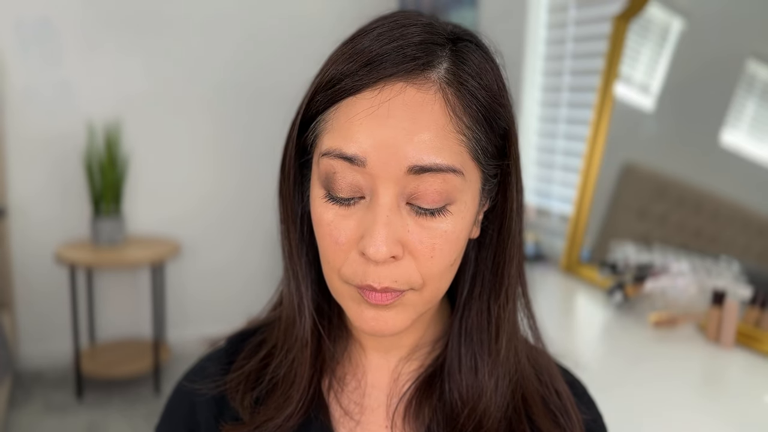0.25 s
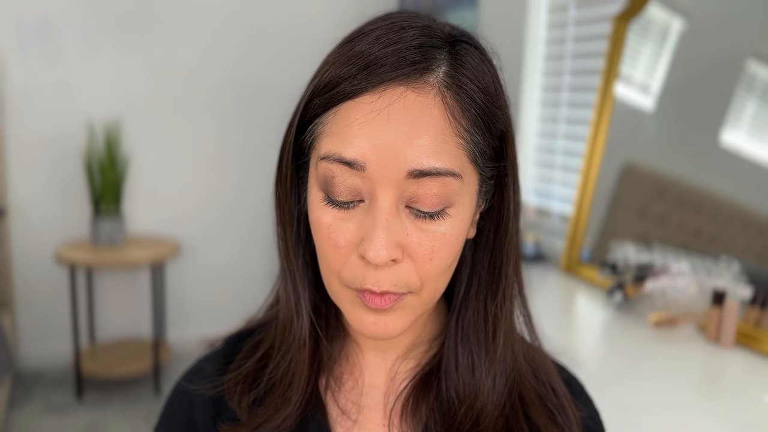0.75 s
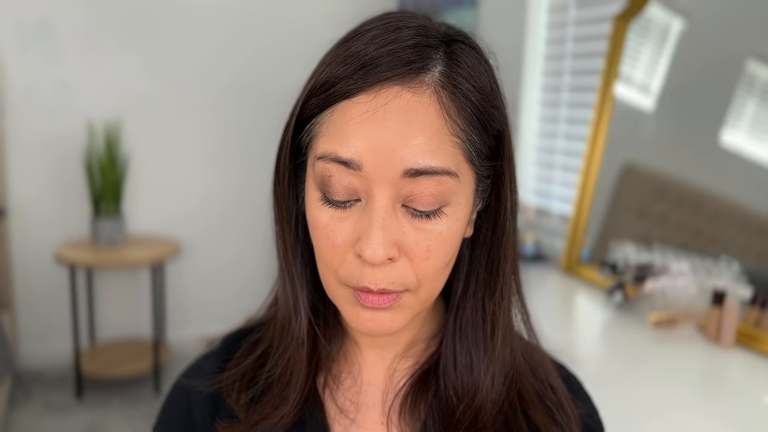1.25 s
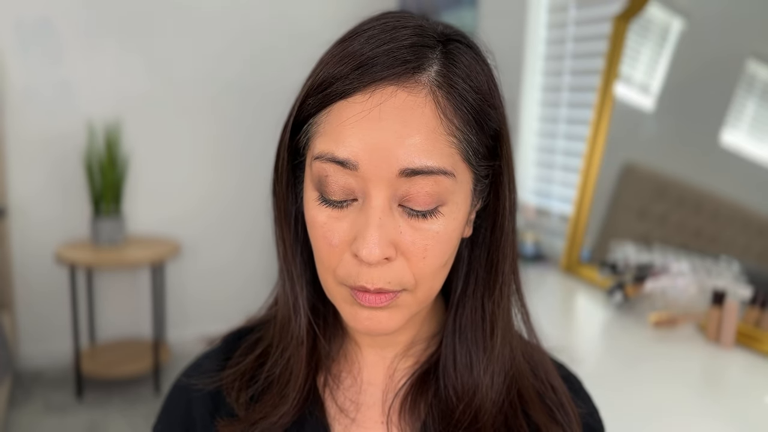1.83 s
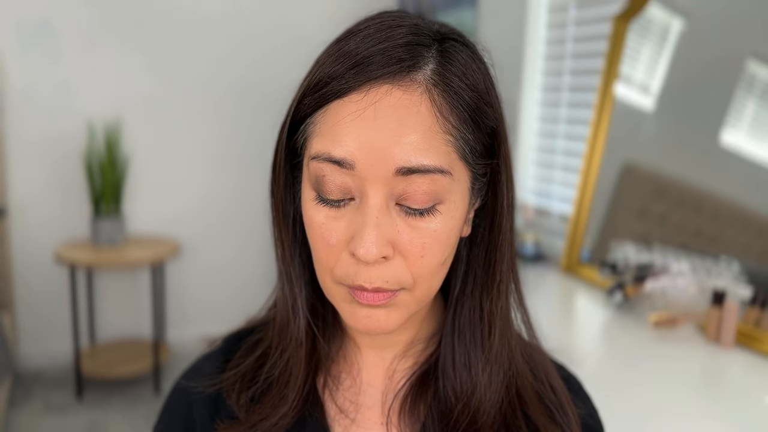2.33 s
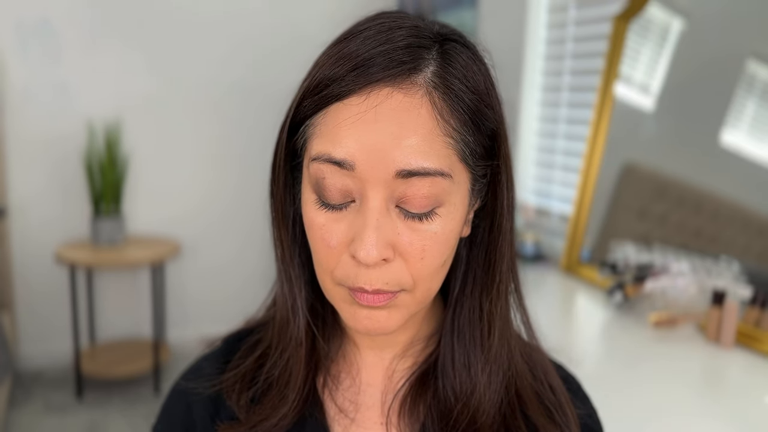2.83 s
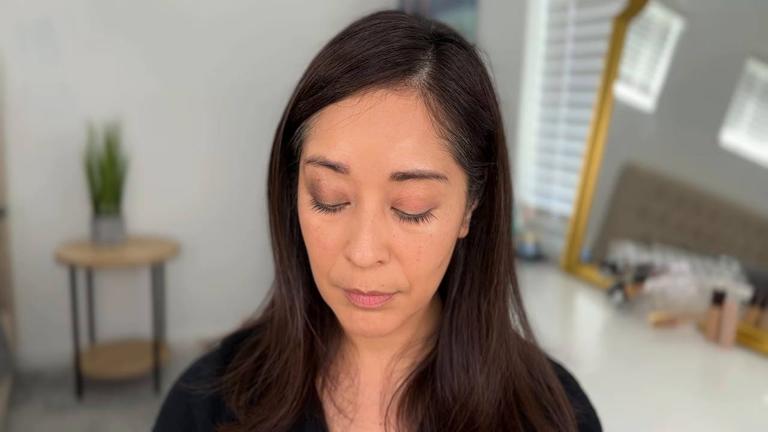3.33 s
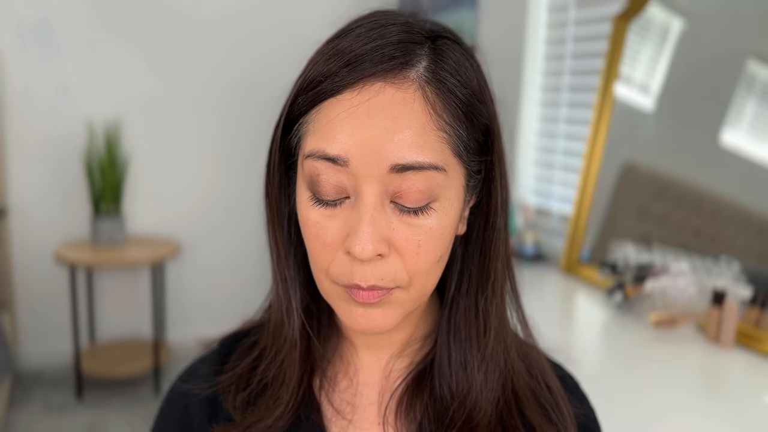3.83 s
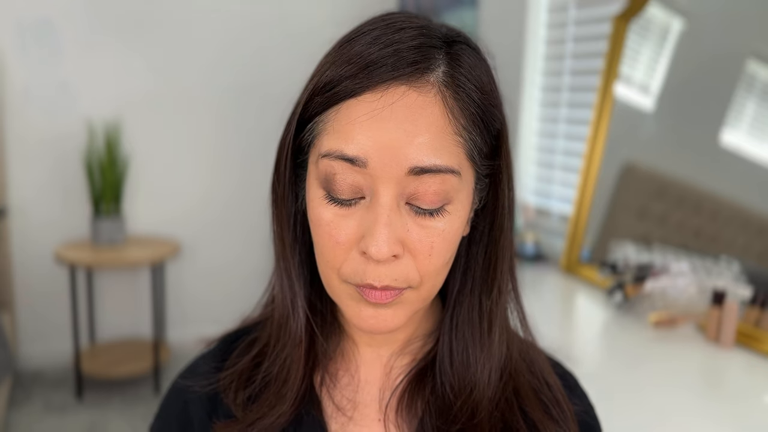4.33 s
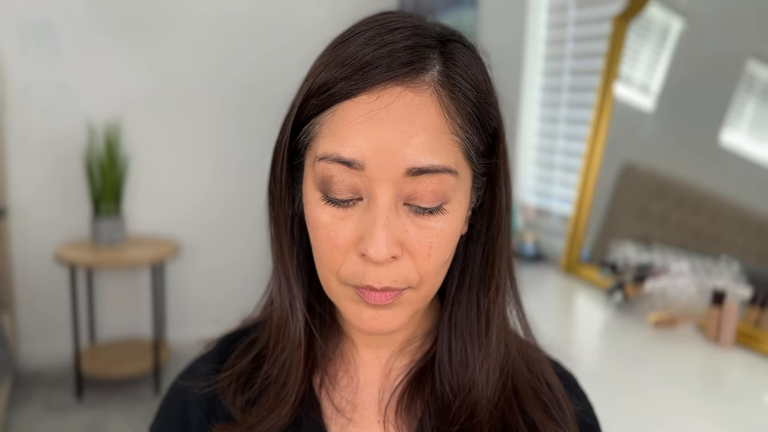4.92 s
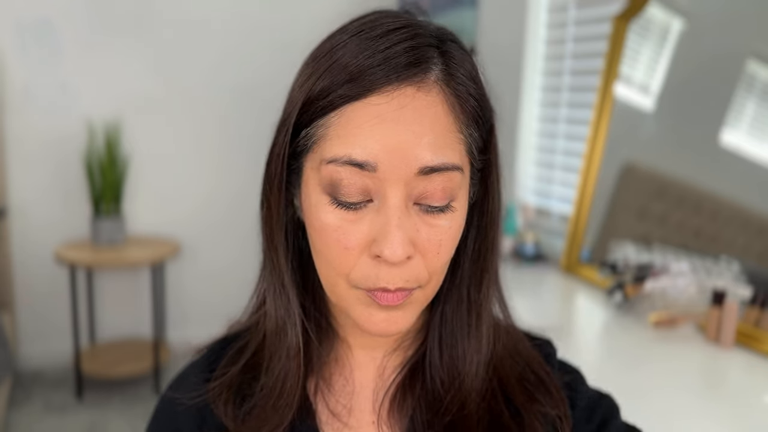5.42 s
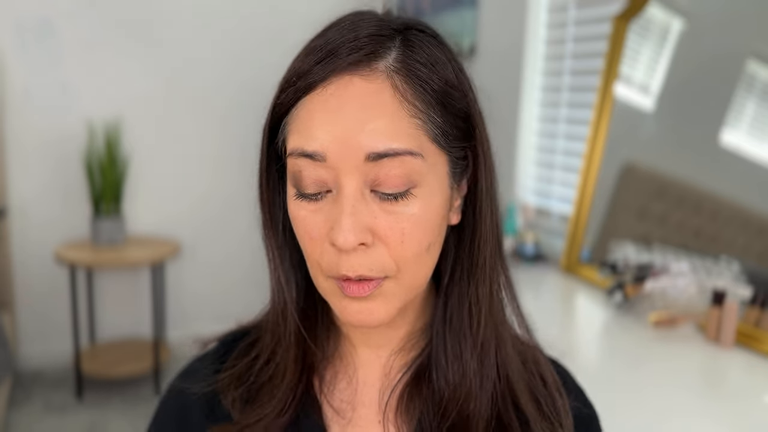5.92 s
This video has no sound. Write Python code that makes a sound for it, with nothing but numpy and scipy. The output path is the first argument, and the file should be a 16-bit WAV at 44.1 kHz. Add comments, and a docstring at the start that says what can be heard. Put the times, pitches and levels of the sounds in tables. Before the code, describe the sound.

Soft handling of a plastic makeup tube indoors: faint rubbing, sharp snaps and tiny squeaks from its cap, then a clatter on a tabletop.

```python
"""In a quiet room, fingers turn a small plastic cosmetic tube close to a phone microphone. Skin slides on the
plastic and hisses. The cap ticks and snaps, which makes the tube ring, and squeaks as it twists. Three times
something is pushed or set down on a table top, which booms. Behind it all the building rumbles and a fan hums
far off."""
import sys
import numpy as np
from scipy import signal
from scipy.fft import rfft, irfft, next_fast_len
from scipy.io import wavfile
from scipy.ndimage import uniform_filter1d, map_coordinates

SR = 44100
rng = np.random.default_rng(int(sys.argv[2]) if len(sys.argv) > 2 else 0)


def bounce(signal):
    """Save signal as a 16-bit WAV file at the path given by the first command-line argument."""
    frames = np.transpose(np.atleast_2d(signal))
    limited = np.clip(frames, -1, 1)
    pcm = np.round(limited * 32767).astype(np.int16)
    wavfile.write(sys.argv[1], SR, pcm)


N = 271920

# tone of the room's air and the fan: f/Hz, relative level/dB
AIR_SPECTRUM = [(13, -32), (22, 6), (48, 1), (88, -11), (181, -7), (297, -13), (341, -16), (829, -28.5),
                (1060, -30), (1520, -38.5), (2120, -36), (3130, -43.5), (12500, -50), (14800, -52),
                (16500, -71)]
# deep rumble of the building: t/s, level/dB
BUILDING_RUMBLE = [(0.0, -58), (0.98, -53.5), (1.36, -69), (1.59, -61), (1.78, -54), (2.42, -63),
                   (3.16, -53.5), (3.67, -60), (3.82, -53), (4.41, -62), (4.8, -57), (6.16, -54)]
# wavering hums of the fan: f/Hz, width/Hz, level/dB
FAN_HUMS = [(115.3, 15, -66), (177.63, 3, -66.5), (285.56, 5, -70), (1134, 230, -83.5), (2117, 150, -82.5)]
# the room's echo: f/Hz, fade/s (a fade is the time to fall by 60 dB)
ROOM_FADES = [(200, 0.26), (2000, 0.31), (10000, 0.18)]
# the table top's modes, the notes it rings at: f/Hz, relative level/dB, fade/s
TABLE_MODES = [(84.7, -2, 0.5), (107.44, 0.5, 0.84), (135, -5.5, 0.28), (192, -8, 0.46), (241, -13.5, 0.71),
               (328, -8.5, 0.18), (397, -18, 0.34)]
# pushes on the table: t/s, gain/dB, rise/s, damping by the hand (0-1), softness/(dB per octave)
TABLE_PUSHES = [(1.978, -34.5, 0.0021, 0.94, -5.5), (5.129, -33, 0.004, 0.84, -7.5),
                (5.151, -23, 0.0071, 0.72, 6), (5.33, -44.5, 0.057, 0.1, 22),
                (5.731, -31.5, 0.0021, 0.43, 4), (5.745, -26, 0.0024, 0.73, -0.5),
                (5.764, -25, 0.0039, 0.78, -3), (5.802, -34.5, 0.0022, 0.24, 4),
                (6.042, -47, 0.0068, 0.3, 2.5)]
# how the phone's housing changes all the hand sounds listed below: f/Hz, gain/dB
HOUSING_GAINS = [(300, 7), (1100, 0.5), (1600, -6.5), (2200, -0.5), (3300, 1.5), (3800, -6.5), (4200, 2),
                 (6000, -4.5), (6450, -5.5), (7000, 4), (8300, -1), (9800, -7.5), (14200, 1), (15300, -7.5),
                 (16300, -18)]
# modes of the tube and cap: f/Hz, width/Hz, relative level/dB
TUBE_MODES = [(785, 320, -1.5), (967, 170, 2.5), (1290, 290, 1.5), (1815, 348, 2), (2208, 278, 1),
              (2703, 410, -1), (3416, 220, -0.5), (4100, 300, -5.5), (4540, 350, -9), (5440, 190, -5)]
# hiss of resting fingers, louder with a firmer grip: t/s, level/dB
GRIP_LEVELS = [(0, -78.5), (.15, -88.5), (.27, -67.5), (.86, -70), (1.03, -94), (1.25, -76), (1.85, -91),
               (2.15, -62), (2.32, -85.5), (3.1, -82.5), (3.23, -71.5), (3.69, -69.5), (3.9, -90),
               (4.41, -76), (4.65, -86), (5.05, -64), (5.2, -72), (5.43, -67), (5.52, -78.5), (5.95, -81.5),
               (6.17, -76)]
# finger and cap strokes: t/s, length/s, tube f/Hz, tube level/dB, hiss level/dB
STROKES = [(0.031, 0.041, 3020, -61.5, -68.5), (.068, 0.011, 3400, -55, -66.5),
           (0.189, 0.056, 3940, -72, -78), (0.237, .05, 3270, -68, -61.5), (0.299, 0.05, 1070, -71, -64.5),
           (0.34, 0.028, 1130, -60, -63.5), (0.428, 0.074, 4470, -63, -63.5),
           (0.571, 0.027, 2830, -66.5, -77), (.648, 0.021, 2980, -64, -64.5),
           (0.751, 0.017, 2970, -64.5, -60), (0.827, 0.047, 2610, -64, -56.5),
           (0.878, .04, 2650, -72, -65.5), (.953, .03, 3370, -62, -56.5), (0.987, 0.026, 1270, -54, -51),
           (1.995, 0.077, 2140, -65, -62), (2.09, 0.044, 2440, -61.5, -56.5),
           (2.16, 0.045, 2180, -60.5, -61.5), (2.221, 0.02, 2430, -61.5, -58.5),
           (2.383, 0.009, 2270, -65.5, -64), (2.448, 0.017, 1030, -67, -77),
           (2.725, 0.087, 2160, -61.5, -66.5), (2.776, .025, 2230, -59.5, -57.5),
           (2.805, .058, 2150, -63, -64), (2.96, .025, 1130, -72, -73), (3.066, 0.043, 2230, -45, -49.5),
           (3.103, 0.0076, 2370, -65, -45), (3.115, 0.044, 2310, -73, -60.5),
           (3.211, 0.047, 2240, -52.5, -56), (3.257, .022, 2200, -53, -54),
           (3.296, 0.038, 2290, -64.5, -57.5), (3.406, 0.062, 2220, -73, -67),
           (3.442, 0.13, 2270, -69.5, -64), (3.518, 0.026, 5100, -60, -55),
           (3.569, 0.018, 2700, -66, -59.5), (3.587, 0.043, 1230, -64, -59.5),
           (3.674, 0.011, 2720, -55.5, -68), (3.71, 0.024, 2380, -61, -45.5),
           (3.774, 0.066, 3030, -62, -52), (3.847, 0.049, 2260, -74, -67.5), (4.042, 0.036, 3140, -64, -63),
           (4.202, 0.09, 3980, -72.5, -64), (4.288, .056, 2550, -71, -61), (4.375, 0.049, 1340, -72.5, -68),
           (4.466, 0.028, 750, -70, -63.5), (4.518, 0.036, 2430, -64.5, -70),
           (4.601, 0.035, 2020, -70, -68), (4.687, 0.023, 2290, -73, -74), (4.804, 0.16, 750, -86, -65),
           (4.96, .063, 1390, -64.5, -75), (5.027, 0.035, 2210, -69, -60),
           (5.053, .008, 2030, -41.5, -42.5), (5.076, 0.032, 2440, -62, -53),
           (5.092, 0.039, 2400, -45.5, -63), (5.149, 0.029, 2320, -42.5, -50.5),
           (5.194, 0.012, 836, -48, -63), (5.253, 0.059, 2500, -51, -60.5),
           (5.305, 0.035, 2530, -39.5, -45), (5.347, 0.0075, 850, -46, -56),
           (5.357, 0.011, 3070, -38, -43.5)]
# centre of the strokes' hiss as different parts of the fingers rub: t/s, f/Hz
STROKE_HISS = [(0, 8770), (2.8, 8600), (3.07, 7460), (3.55, 8200), (3.71, 11100), (3.82, 10900),
               (4.05, 10030), (4.45, 9550), (4.8, 8000), (5.03, 9900), (5.1, 7100), (6.17, 7000)]
# squeaks of the twisting cap: t/s, length/s, start f/Hz, end f/Hz, level/dB
CAP_SQUEAKS = [(3.232, .045, 2300, 2200, -56), (5.057, .012, 1500, 1300, -48),
               (5.098, .038, 2450, 2750, -48), (5.155, .025, 2500, 2250, -52),
               (5.255, .045, 3000, 2450, -54), (5.315, .025, 2000, 1950, -46),
               (5.358, .015, 3100, 3300, -42)]
# hollow notes of the cap in the fingers or on the table, and a few short squeaks (0.223, 4.247, 4.579 s): t/s,
# level/dB, f/Hz, fade/s
CAP_KNOCKS = [(.223, -53, 4000, 0.033), (.354, -61, 470, .025), (.861, -49.5, 597, .025),
              (1.977, -29.5, 275, 0.021), (1.978, -20, 1300, 0.019), (1.979, -27, 820, .015),
              (1.979, -29, 2160, 0.088), (2.215, -55, 600, .025), (2.931, -48, 1240, 0.05),
              (3.048, -29, 1410, .015), (3.057, -33, 2160, 0.06), (3.057, -24, 1840, .02),
              (3.253, -38, 627, 0.019), (3.676, -46.5, 258, 0.022), (4.247, -52.5, 4000, 0.037),
              (4.579, -53, 1840, .04), (5.122, -48.5, 425, 0.028), (5.191, -44, 420, 0.021),
              (5.347, -43, 870, 0.057), (5.36, -35, 1950, 0.089), (5.73, -26, 674, 0.031),
              (5.738, -29, 246, 0.034), (5.744, -29, 253, 0.03), (5.748, -33, 630, .025),
              (5.758, -42, 455, 0.021)]
# contacts of cap, tube and nails: t/s, level/dB, centre f/Hz, relative treble level/dB, fade/s
CONTACTS = [(.203, -54, 2580, -18, .017), (.246, -49, 3250, 1, 0.011), (.354, -37.5, 1110, -8, 0.0076),
            (0.389, -38, 2200, -17, 0.018), (.501, -50, 1150, -19, 0.023), (.541, -49, 1110, -18, 0.016),
            (.578, -55, 2870, -13, .017), (0.731, -53, 1150, -8, .012), (.861, -36.5, 2520, -15, 0.021),
            (.891, -45.5, 2540, -3, 0.018), (1, -41, 2600, 3, 0.011), (1.171, -51.5, 2450, -7, 0.022),
            (1.473, -56.5, 1260, -2.5, 0.024), (1.977, -18.5, 2200, -2, 0.038),
            (1.979, -17.5, 1206, 6, .014), (2.137, -49, 3330, 0, 0.02), (2.215, -44, 1130, -7, .011),
            (2.249, -51, 2050, 4, 0.013), (2.278, -47.5, 2770, -19, .007), (2.353, -59, 2090, 8.5, 0.012),
            (2.409, -61, 2400, 1, 0.018), (2.461, -59, 3020, 2, .013), (2.71, -44.5, 2250, 0, .015),
            (2.712, -42.5, 2220, -2, .021), (2.931, -37.5, 1260, -23, 0.0099), (2.94, -47, 1090, -31, .018),
            (2.948, -42.5, 1250, -27, .02), (3.049, -18, 2260, 6, 0.012), (3.057, -15.5, 2190, -0.5, 0.016),
            (3.061, -29, 2200, -17, .014), (3.067, -27, 2200, -19, 0.013), (3.253, -29.5, 1960, 9.5, 0.008),
            (3.483, -54.5, 2250, 10, .013), (3.538, -44.5, 1210, -11, 0.021), (3.676, -49, 3070, 1, 0.011),
            (3.743, -44, 2060, -6, .013), (3.863, -51, 2250, 0.5, 0.014), (4.02, -49, 2900, 1.5, 0.017),
            (4.123, -56, 1070, 4, 0.022), (4.39, -56, 1330, 6.5, 0.014), (4.531, -49, 2420, 2.5, 0.011),
            (5.117, -37, 2480, -7, .012), (5.123, -28.5, 2550, -1.5, 0.014), (5.191, -24, 3060, -1, 0.0057),
            (5.224, -40, 1960, -26, .018), (5.73, -15.5, 1490, -4, 0.026), (5.739, -15, 2600, -25, .005),
            (5.744, -23, 1500, 0, 0.026), (5.748, -17, 1590, -20, .016), (5.758, -23, 1100, 0.5, 0.0136)]


def amp(db):
    """Turn decibels into a gain."""
    return 10 ** (np.asarray(db) / 20)


def unit(x):
    """Scale a signal to an average power of one."""
    return x / np.sqrt(np.mean(x ** 2) + 1e-20)


def along(points, hz):
    """Read between (frequency, value) points on a log frequency scale."""
    f, v = np.transpose(points)
    return np.interp(np.log(hz + 1), np.log(f + 1), v)


def curve(points):
    """Join (time, value) points with straight lines, one value per sample."""
    return np.interp(np.arange(N) / SR, *np.transpose(points))


def wobble(rate):
    """A smooth curve through `rate` random values a second."""
    return map_coordinates(rng.standard_normal(int(N * rate / SR) + 4), [np.arange(N) * rate / SR])


def filtered(x, response):
    """Filter x by response(f), which sets the gain and phase at each frequency."""
    size = next_fast_len(len(x) + 4096)
    return irfft(rfft(x, size) * response(np.fft.rfftfreq(size, 1 / SR)), size)[:len(x)]


def peak(f, hz, width):
    """One resonance: it passes the frequencies near hz."""
    return 1j * f * width / (hz * hz - f * f + 1j * f * width)


def add(track, s, sound):
    """Mix a sound into a track, starting at s seconds."""
    part = track[round(s * SR):][:len(sound)]
    part += sound[:len(part)]


def background():
    """Steady air noise, the building's swelling rumble and the fan's unsteady hums."""
    def noise(response):
        return unit(filtered(rng.standard_normal(N), response))
    air = noise(lambda f: amp(along(AIR_SPECTRUM, f)))
    rumble = noise(lambda f: peak(f, 35, 28) ** 2)
    fan = sum(amp(db + 0.58 * wobble(1.4)) * noise(lambda f: peak(f, hz, width) ** 2)
              for hz, width, db in FAN_HUMS)
    return amp(-56.5) * air + amp(curve(BUILDING_RUMBLE) + 1.9 * wobble(4)) * rumble + fan


def room_echo(x, delay_samples=200):
    """Each frequency of the echo fades at its own speed; moving hands keep changing its paths."""
    out, block = np.zeros(N), SR // 4
    for start in range(0, N, block):
        hz, t, spectrum = signal.stft(rng.standard_normal(SR // 2), SR, nperseg=256)
        fade = amp(-60 * t / along(ROOM_FADES, hz)[:, None])
        tail = signal.istft(spectrum * fade, SR, nperseg=256)[1]
        echo = signal.fftconvolve(x[start:start + block], tail / np.linalg.norm(tail))
        add(out, (start + delay_samples) / SR, echo)
    return out


def table_thuds():
    """The table top booms; a soft push weakens the high modes and a resting hand shortens the ring."""
    out, t = np.zeros(N), np.arange(SR) / SR
    for s, db, rise, damping, soft_db in TABLE_PUSHES:
        ring_share = np.clip(1 - damping, .05, 1)
        boom = np.zeros(len(t))
        for hz, mode_db, fade in TABLE_MODES:
            start_db = mode_db - soft_db * abs(np.log2(hz / 100))
            boom += amp(start_db - 60 * t / (fade * ring_share)) * np.sin(2 * np.pi * hz * t)
        add(out, s, amp(db) * boom * (1 - np.exp(-t / max(rise, .001))))
    return out


def phone_housing(x, size=2048):
    """The phone's housing lifts some frequencies and weakens others."""
    log_gain = np.log(amp(along(HOUSING_GAINS, np.fft.rfftfreq(size, 1 / SR))))
    cepstrum = irfft(log_gain)
    # fold the second half onto the first, so the filter rings only after a sound
    cepstrum[1:size // 2] *= 2
    cepstrum[size // 2 + 1:] = 0
    return signal.fftconvolve(x, irfft(np.exp(rfft(cepstrum))))[:N]


def tube_response(f, hz, focus_db):
    """The tube's modes, focus_db weaker per octave from hz, plus the air gap under the grip at hz."""
    modes = sum((-1) ** k * amp(db - focus_db * abs(np.log2(mode_hz / hz))) * peak(f, mode_hz, width)
                for k, (mode_hz, width, db) in enumerate(TUBE_MODES))
    return modes + amp(0.47 * focus_db - 9) * peak(f, hz, 200)


def skin_friction(size, swing_db):
    """Rubbing noise whose tone wanders as skin ridges catch and let go."""
    spectrum = signal.stft(rng.standard_normal(size), nperseg=256)[2]
    patches = uniform_filter1d(rng.standard_normal(spectrum.shape), size=7, axis=0)  # blur in frequency
    patches = uniform_filter1d(patches, size=9, axis=1)  # blur in time
    return signal.istft(spectrum * amp(swing_db * np.tanh(unit(patches))), nperseg=256)[1][:size]


def finger_creep():
    """Resting fingers creep over the plastic: a high hiss and a lower rustle from the tube."""
    grip_db = curve(GRIP_LEVELS)
    rustle_db = grip_db.mean() + 1 + .7 * (grip_db - grip_db.mean())  # swings less than the hiss
    hiss = unit(filtered(skin_friction(N, swing_db=11.0), lambda f: peak(f, 8500, 9000) ** 2))
    rustle = unit(filtered(skin_friction(N, swing_db=4.5), lambda f: peak(f, 1760, 3300) ** 2))
    flutter_db = 3.0 * wobble(25)
    return amp(grip_db + flutter_db) * hiss + amp(rustle_db + flutter_db) * rustle


def sliding_strokes(rise_share=.3):
    """A surface breaks loose, slides briefly and grips again, making the tube ring."""
    out, t = np.zeros(N), np.arange(SR // 4) / SR
    friction = skin_friction(len(t) * len(STROKES) * 2, swing_db=4.0).reshape(len(STROKES), 2, -1)
    for (s, length, tube_hz, tube_db, hiss_db), (tube_noise, hiss_noise) in zip(STROKES, friction):
        rise = np.clip(t / max(rise_share * length, .001), 0, 1)
        fall = amp(-60 * np.clip(t - length, 0, None) / 0.017)
        judder_db = np.clip(2 + 0.092 * (tube_db + 61.5), 0, 3.5)  # hard strokes judder
        slips = amp(judder_db * np.repeat(rng.standard_normal(len(t) // 49), 49))
        focus_db = 7.5 + 0.21 * (tube_db + 52.5)  # more pressure, clearer squeak
        ring = unit(filtered(tube_noise * slips, lambda f: tube_response(f, tube_hz, focus_db)))
        hiss_hz = np.interp(s, *np.transpose(STROKE_HISS))
        width = 0.82 * hiss_hz ** 2 / 9000
        hiss = unit(filtered(hiss_noise, lambda f: peak(f, hiss_hz, width) ** 2 + .4 * peak(f, 6030, 500)))
        add(out, s, rise * fall * (amp(tube_db) * ring + amp(hiss_db) * hiss))
    return out


def cap_squeaks():
    """Plastic slips on plastic as the cap twists, giving a shaky, gliding tone."""
    out, shake = np.zeros(N), wobble(250)
    for s, length, from_hz, to_hz, db in CAP_SQUEAKS:
        progress = np.arange(round(length * SR)) / (length * SR)
        phase = 2 * np.pi * np.cumsum(from_hz + (to_hz - from_hz) * progress) / SR
        add(out, s, amp(db) * np.sqrt(np.sin(np.pi * progress)) * np.sin(phase))
    return out * (1 + .8 * shake)


def cap_knocks():
    """The cap's wall, or the air inside it, rings with one short note; a few short squeaks are played the same
    way."""
    out, t = np.zeros(N), np.arange(SR // 10) / SR
    rise = np.clip(t / 0.0011, 0, 1)
    for s, db, hz, fade in CAP_KNOCKS:
        add(out, s, amp(db - 60 * t / fade) * np.sin(2 * np.pi * hz * t) * rise)
    return out


def contact_ticks():
    """Each contact is a short crack that rings the tube and has a bright edge."""
    out, t = np.zeros(N), np.arange(SR // 10) / SR
    rise = np.clip(t / 0.00013, 0, 1)
    for s, db, hz, treble_db, fade in CONTACTS:
        crack, treble = rng.standard_normal((2, len(t))) * amp(-60 * t / fade) * rise
        crack[0] = 4.8  # the first hit, stronger than the crackle after it
        ring = filtered(crack, lambda f: tube_response(f, hz, focus_db=11))
        treble *= amp(-60 * t / 0.09)  # the treble is over sooner
        edge = filtered(treble, lambda f: peak(f, 7570, 11000) ** 2)
        add(out, s, amp(db) * (ring / abs(ring).max() + amp(treble_db) * edge / abs(edge).max()))
    return out


def scene():
    """Hand sounds and their echo pass through the housing; the table and background join them."""
    hands = finger_creep() + sliding_strokes() + contact_ticks() + cap_knocks() + cap_squeaks()
    hands_in_room = hands + amp(-13.5) * room_echo(hands)
    return (phone_housing(hands_in_room) + table_thuds() + background())[None]


def record(dry, top_hz=16600):
    """The phone keeps nothing above top_hz."""
    return filtered(dry[0], lambda hz: hz < top_hz)[None]


dry = scene()
out = record(dry)
bounce(out)
```